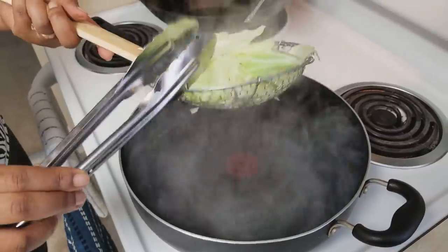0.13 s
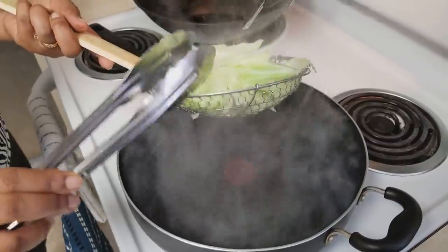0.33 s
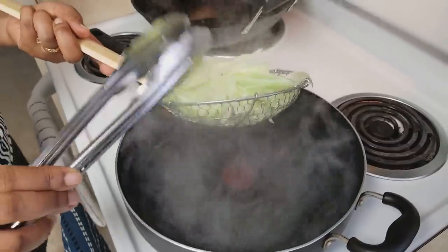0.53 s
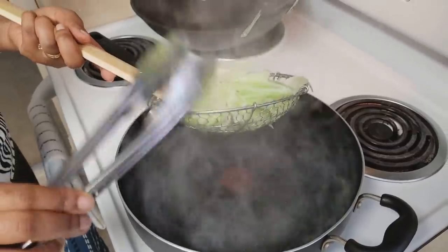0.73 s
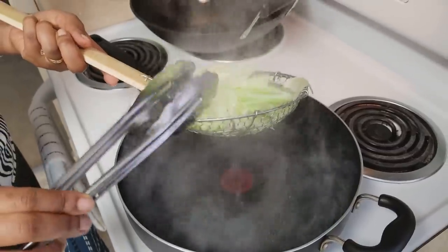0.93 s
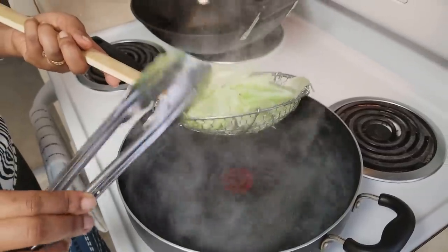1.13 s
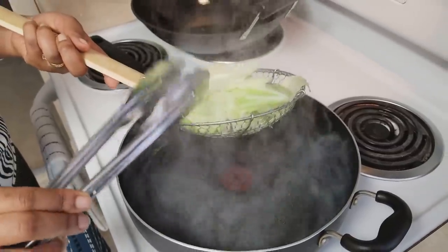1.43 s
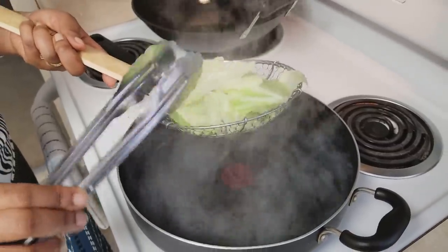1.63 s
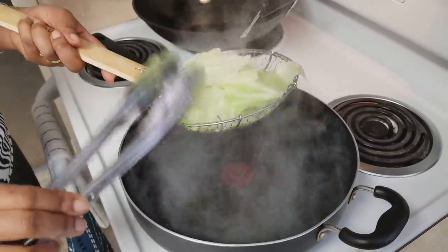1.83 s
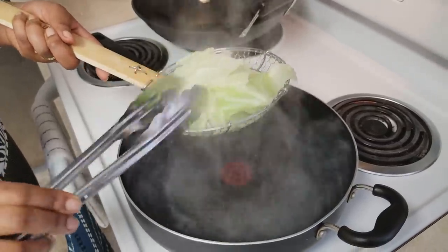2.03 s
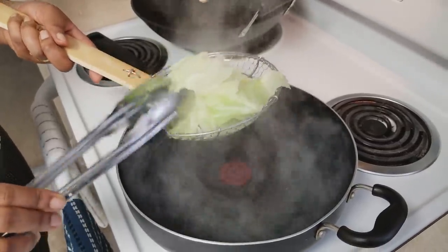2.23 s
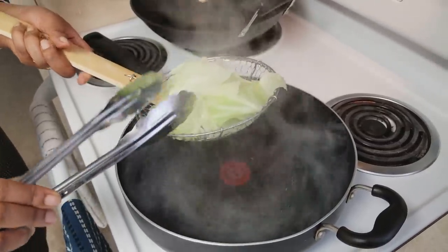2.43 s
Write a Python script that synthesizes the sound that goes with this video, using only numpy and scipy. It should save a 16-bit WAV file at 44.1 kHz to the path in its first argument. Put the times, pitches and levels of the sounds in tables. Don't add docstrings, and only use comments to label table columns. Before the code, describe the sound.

Steel tongs rap a wire strainer about six times a second, bright, dry clacks with short rings and tiny wire rattles; close stereo microphone slightly left, hard kitchen, low fan rumble and fridge hum behind.

```python
import sys
import numpy as np
from scipy import signal
from scipy.fft import rfft, irfft, next_fast_len
from scipy.io import wavfile

SR = 44100
rng = np.random.default_rng(int(sys.argv[2]) if len(sys.argv) > 2 else 0)


def makeup_ratio(level_db):
    decades = np.asarray(level_db, float) / 20
    return 10 ** decades


def store_wav(level_fs):
    pcm = np.round(np.clip(np.atleast_2d(level_fs), -1, 1) * 32767)
    wavfile.write(sys.argv[1], SR, pcm.T.astype(np.int16))


N = 114660

# (frequency [Hz], level [dB rms])
HUM_BANDS = [(118.4, -59.5), (161.5, -62.5), (296.1, -68)]
# (frequency [Hz], density [dB per Hz])
RUMBLE_SPECTRUM = [(15, -17), (25, -18.5), (64, 0), (92, -10), (167, -17.5), (213, -10), (408, -15.5),
                   (484, -17.5), (1500, -33), (1950, -77), (3300, -120)]
# (frequency [Hz], density [dB per Hz])
HISS_SPECTRUM = [(600, -35), (1200, -15), (2000, -6.5), (3500, -12), (7000, -14), (9300, -14), (11000, -18),
                 (15700, -18)]
# (frequency [Hz], density [dB per Hz])
CLATTER_SPECTRUM = [(180, -3), (300, 2.5), (450, -7), (700, -9.5), (1500, -14.5), (2500, -26), (5000, -48)]
# (frequency [Hz], correlation [0-1])
PORT_LIKENESS = [(40, 1), (200, 0.93), (400, 0.81), (1000, 0.033)]
# (frequency [Hz], t60 [s])
WALL_T60 = [(500, 0.34), (2000, 0.32), (5000, 0.28), (10000, 0.24), (16000, 0.19)]
# (frequency [Hz], level [dB])
WALL_COLOUR = [(500, -1.5), (2000, -1.5), (6000, 0.5), (9500, -1.5), (15000, 0)]
# (time [s], level [dB])
TIP_TICKS = [
    (.6415, -19),
    (.7775, -19),
    (.9388, -24),
    (1.2083, -24),
    (1.2233, -23),
    (1.897, -22),
    (2.2055, -23),
]
# (frequency [Hz], level [dB], t60 [s])
TIP_MODES = [(14400, -10, 0.008), (11120, -16.5, 0.0041)]
# (frequency [Hz], level [dB])
MESH_COLOUR = [(500, -24.5), (1750, -17), (2000, -6), (3800, -6), (6500, -3), (9200, -9), (13000, -0.5),
               (15700, -3.5)]
# (frequency [Hz], t60 [s])
MESH_DECAY = [(800, 0.071), (3000, 0.052), (8000, 0.036), (15000, 0.031)]
# (frequency [Hz], level [dB], t60 [s])
STEEL_MODES = [(560, -36.5, 0.028), (780, -31, 0.041), (1043, -37.5, 0.022), (1386, -32, 0.048),
               (2496, -36, 0.066), (3450, -30.5, 0.092), (4050, -31.5, 0.05), (4120, -35, 0.042),
               (5020, -33, .08), (5820, -24, 0.11), (5970, -28.5, 0.16), (7550, -35, 0.068),
               (13600, -36, 0.023)]
# (frequency [Hz], level [dB], t60 [s])
LOWER_ARM_MODES = [(3137.4, -0.5, .12), (3225, 5, 0.028)]
# (frequency [Hz], level [dB], t60 [s])
UPPER_ARM_MODES = [(5000, -7.5, 0.052), (5050, -14, .03)]
# (frequency [Hz], level [dB], t60 [s])
RIM_MODES = [(1968.5, -1, 0.043), (2028.5, -0.5, 0.085), (2144, -1, 0.088), (2225, -3, .12)]
# (time [s], peak [dB], lower arm ring [dB], rim ring [dB], body under the top [dB])
RAPS = [(0.1497, -27, -21.5, -19, 1), (0.2954, -19, -24, -29, 2), (0.4572, -21, -20, -23, 4),
        (0.625, -18.5, -19.5, -20.5, 1.5), (0.7738, -20.5, -20, -22.5, 1.5), (0.9223, -18, -23, -25, -2),
        (1.072, -20.5, -13, -23.5, 0.5), (1.2057, -19.5, -26, -21, -1.5), (1.3887, -22.5, -33, -29, -3),
        (1.5478, -19, -29.5, -24, -1), (1.713, -21, -22.5, -21.5, 0.5), (1.8821, -16, -21, -23, -8),
        (2.0528, -22, -23, -19, 1.5), (2.2006, -19.5, -23.5, -21, 0.5), (2.3228, -25, -24.5, -22, 0.5)]
# (time [s], peak [dB], lower arm ring [dB], upper arm ring [dB], body [dB])
BRUSHES = [(-.07, -31, -37, -33, -1), (.031, -53, -33, -30, 6), (0.4658, -26, -13, -38, -0.5),
           (.6295, -32.5, -18, -33, 2), (.6415, -25.5, -29, -28, -5), (0.779, -31, -16, -39, -14),
           (0.9387, -33, -14, -30, -3), (1.080, -27, -21, -33, 5), (1.2237, -31, -24, -40, 0),
           (1.718, -25.5, -22.5, -20, -7.5), (1.8945, -29, -31, 5, 4.5), (1.897, -20, -23.5, -29, -3),
           (2.0663, -31, -26, -16, 10), (2.213, -36, -21, -4, 0)]

HUM_WIDTH_HZ, RUMBLE_DB, HISS_DB, FLOOR_PAN_DB = 8.9, -58, -75, 0.73
CLATTER_DB, CLATTER_T60_S = -51.5, 0.5
KITCHEN_DB, FIRST_WALL_S = 4, 0.0011
NEAR_T60_S, NEAR_DB = 0.017, 4
RING_WET_DB, MESH_WET_DB = -4, -14
BLOW_DB, BLOW_S = 19, 0.0007924
LEFT_DB, RIGHT_DB, RIGHT_LAG_S, SHADOW_HZ = 2.5, -8.5, 0.00035, 12300
PING_LEFT_DB, PING_RIGHT_DB, PING_RISE_S = 12, 2, 0.00044
MESH_DB, CRACK_DB, CRACK_T60_S, RISE_S = -9, 8.5, 0.0064, 0.00032
SCATTER_DB, BODY_HZ = 4.5, 6500
WAVER, WAVER_HZ = 0.45, 60
RATTLES, RATTLE_S, RATTLE_DB = 6, 0.048, -16
TOP_HZ, RAP_TOP_HZ = 15800, 16800
LEAD_S = 0.1


def unit(x):
    return x / np.sqrt(np.mean(x ** 2) + 1e-20)


def along(points, hz):
    f, v = np.transpose(points)
    return np.interp(np.log(hz + 1), np.log(f + 1), v)


def filtered(x, response):
    m = next_fast_len(x.shape[-1] + 4096)
    spectrum = rfft(x, m) * response(np.fft.rfftfreq(m, 1 / SR))
    return irfft(spectrum, m)[..., :x.shape[-1]]


def below(top_hz, order):
    return lambda f: 1 / (1 + (f / top_hz) ** order)


def closed(points):
    return lambda hz: makeup_ratio(along(points, hz)) * (hz > points[0][0]) * (hz < TOP_HZ)


def ring(modes, t):
    hz, db, t60 = np.transpose(modes)[:, :, None]
    return makeup_ratio(db - 60 * t / t60) * np.sin(2 * np.pi * hz * t)


def rush(gain):
    def mid_side(hz):
        turn = np.arccos(np.clip(along(PORT_LIKENESS, hz), -1, 1)) / 2
        return gain(hz) * [np.cos(turn), np.sin(turn)]
    mid, side = filtered(rng.standard_normal((2, N)), mid_side)
    return unit(np.array([mid + side, mid - side]))


def fridge():
    return sum(makeup_ratio(db) * rush(lambda f: 1 / (1 + ((f - hz) / HUM_WIDTH_HZ) ** 2)) for hz, db in HUM_BANDS)


def hood():
    return makeup_ratio(RUMBLE_DB) * rush(closed(RUMBLE_SPECTRUM)) + makeup_ratio(HISS_DB) * rush(closed(HISS_SPECTRUM))


def pan_clatter():
    fade = makeup_ratio(CLATTER_DB - 60 * np.arange(N) / SR / CLATTER_T60_S)
    return fade * rush(closed(CLATTER_SPECTRUM))


def background():
    return (fridge() + hood() + pan_clatter()) * makeup_ratio([[FLOOR_PAN_DB], [-FLOOR_PAN_DB]])


def kitchen(x):
    hz, t, z = signal.stft(rng.standard_normal((2, SR // 2)), SR, nperseg=128)
    fade = makeup_ratio(-60 * t / along(WALL_T60, hz)[:, None]) + makeup_ratio(NEAR_DB - 60 * t / NEAR_T60_S)
    colour = makeup_ratio(along(WALL_COLOUR, hz)[:, None])
    tail = signal.istft(z * fade * colour, SR, nperseg=128)[1]
    tail = tail * np.clip(np.arange(tail.shape[1]) / SR / FIRST_WALL_S, 0, 1)
    return signal.fftconvolve(x[None], tail / np.linalg.norm(tail[0]), axes=1) * makeup_ratio(KITCHEN_DB)


def pings():
    t, out = np.arange(600) / SR, np.zeros((2, N))
    tick = ring(TIP_MODES[:1], t)[0] * (1 - np.exp(-t / PING_RISE_S))
    for s, db in TIP_TICKS:
        out[0, round(s * SR):][:len(t)] += makeup_ratio(db + PING_LEFT_DB) * tick
        out[1, round((s + RIGHT_LAG_S) * SR):][:len(t)] += makeup_ratio(db + PING_RIGHT_DB) * tick
    return out


def mesh_modes(t):
    hz = np.linspace(500, 15700, 500) + rng.uniform(-15, 15, 500)
    life_s = along(MESH_DECAY, hz) * np.exp(0.49 * rng.standard_normal(len(hz)))
    db = along(MESH_COLOUR, hz)
    return hz, ring(np.c_[hz, db, life_s], t) / np.linalg.norm(makeup_ratio(db))


def clear_rings(t, lower_db, part, part_db, body_db):
    steel_db = body_db + SCATTER_DB * rng.uniform(-2.4, 1.17, len(STEEL_MODES))
    rings = makeup_ratio(steel_db) @ ring(STEEL_MODES, t)
    rings = rings + makeup_ratio(lower_db) * ring(LOWER_ARM_MODES, t).sum(axis=0)
    rings = rings + makeup_ratio(part_db) * ring(part, t).sum(axis=0)
    shake = unit(filtered(rng.standard_normal(len(t)), below(WAVER_HZ, order=4)))
    return rings * (1 + WAVER * shake)


def tip_rattle(t):
    when, size = rng.uniform(size=(2, RATTLES))
    at = np.r_[0, (when * RATTLE_S * SR).astype(int)]
    strength = np.r_[1, makeup_ratio(RATTLE_DB - 12 * when) * (2 * size - 1)]
    ticks = np.bincount(at, strength, len(t))
    return signal.fftconvolve(ticks, ring(TIP_MODES, t[:400]).sum(axis=0))[:len(t)]


def tongs():
    t = np.arange(SR // 6) / SR
    mesh_hz, mesh_waves = mesh_modes(t)
    rise = 1 - np.exp(-t / RISE_S)
    out = np.zeros((2, N + 2 * SR))
    contacts = [(row, RIM_MODES, RAP_TOP_HZ) for row in RAPS]
    contacts += [(row, UPPER_ARM_MODES, TOP_HZ) for row in BRUSHES]
    for (s, db, lower_db, part_db, body_db), part, top_hz in contacts:
        body = lambda f: makeup_ratio(body_db / (1 + (f / BODY_HZ) ** 4))
        colour = lambda f: makeup_ratio(along(MESH_COLOUR, f)) * body(f) * below(top_hz, order=60)(f)
        mesh = body(mesh_hz) * rng.standard_normal(len(mesh_waves)) @ mesh_waves
        rings = clear_rings(t, lower_db, part, part_db, body_db)
        ping = filtered(tip_rattle(t), below(top_hz, order=60))
        crack = filtered(rng.standard_normal(len(t)) * makeup_ratio(-60 * t / CRACK_T60_S), colour)
        metal = filtered((makeup_ratio(MESH_DB) * mesh + rings) * rise, below(TOP_HZ, order=60))
        left = makeup_ratio(db) * (metal + makeup_ratio(CRACK_DB) * crack * rise + ping)
        right = filtered(left, lambda f: np.exp(-2j * np.pi * f * RIGHT_LAG_S) / (1 + 1j * f / SHADOW_HZ))
        blow = filtered(1. * (t == 0), lambda f: colour(f) * np.exp(-2j * np.pi * f * BLOW_S))
        to_walls = makeup_ratio(db + RING_WET_DB) * rings + makeup_ratio(db + MESH_WET_DB) * mesh + makeup_ratio(db + BLOW_DB) * blow
        wet = filtered(kitchen(to_walls), below(TOP_HZ, order=200))
        at = round((s + LEAD_S) * SR)
        out[:, at:at + wet.shape[1]] += wet
        out[:, at:at + len(t)] += np.array([left, right]) * makeup_ratio([[LEFT_DB], [RIGHT_DB]])
    return out[:, round(LEAD_S * SR):][:, :N]


def scene():
    return background() + pings() + tongs()


def band_limit(x):
    return signal.sosfilt(signal.butter(12, 17040, fs=SR, output="sos"), x)


def record(dry):
    return band_limit(dry)


dry = scene()
out = record(dry)
store_wav(out)
```